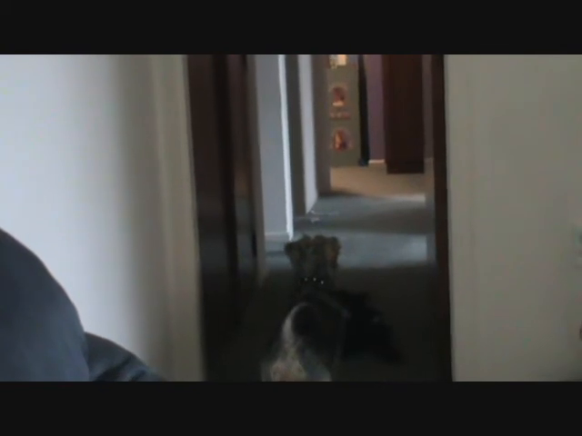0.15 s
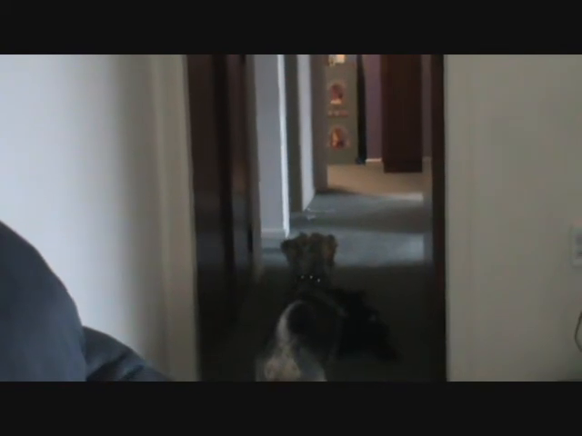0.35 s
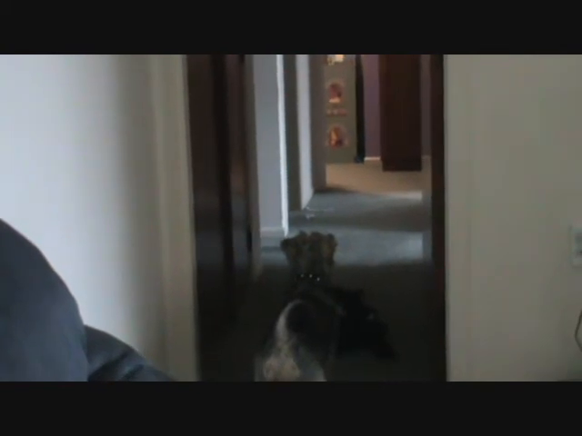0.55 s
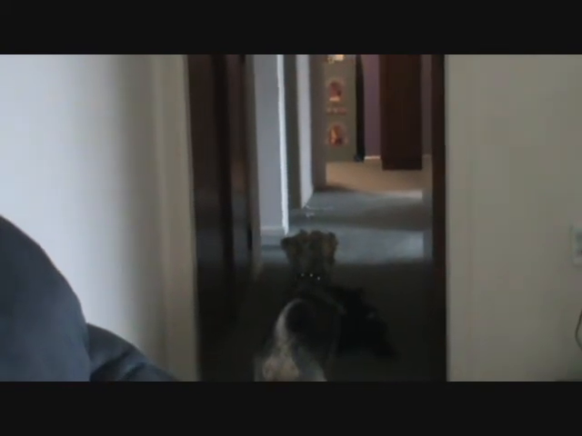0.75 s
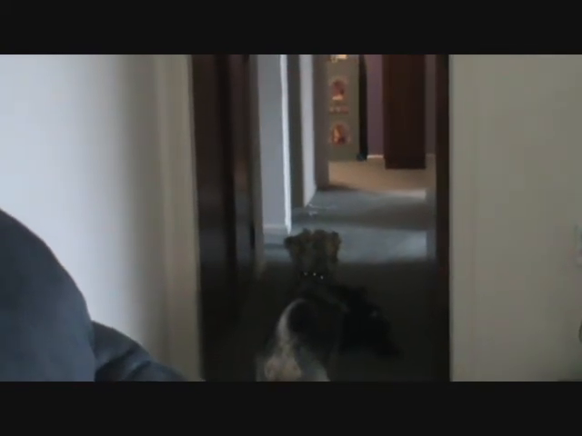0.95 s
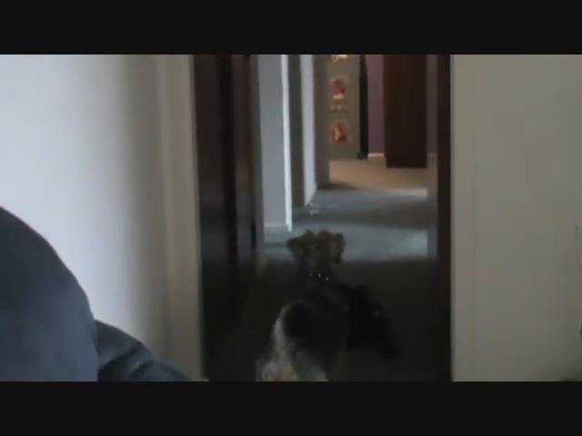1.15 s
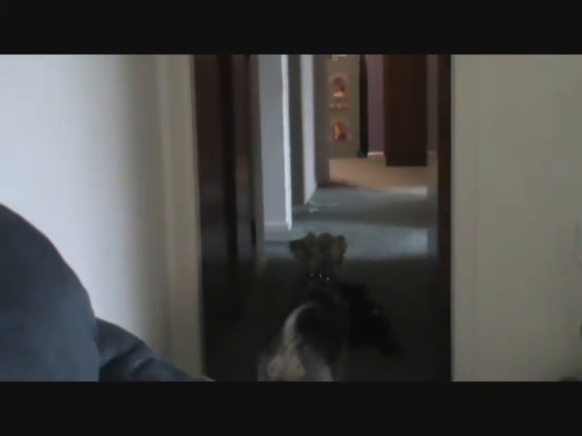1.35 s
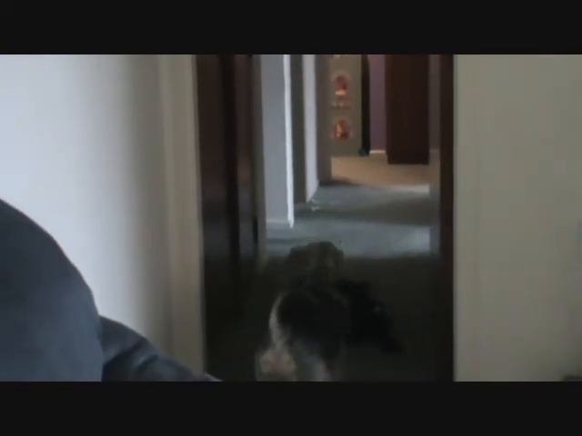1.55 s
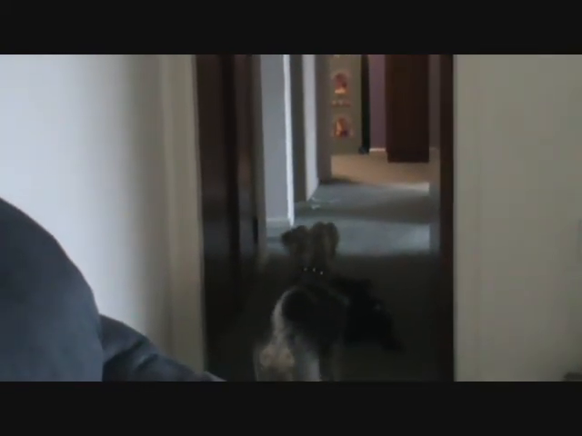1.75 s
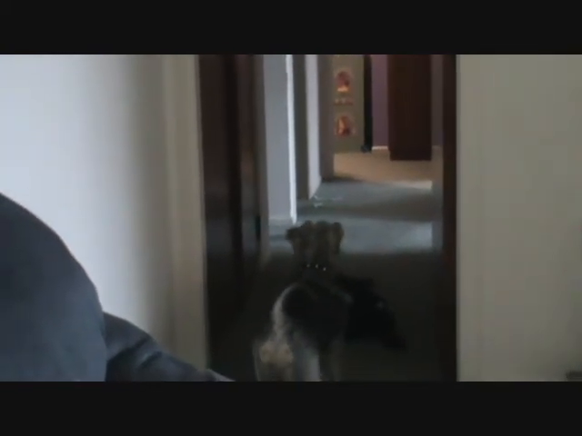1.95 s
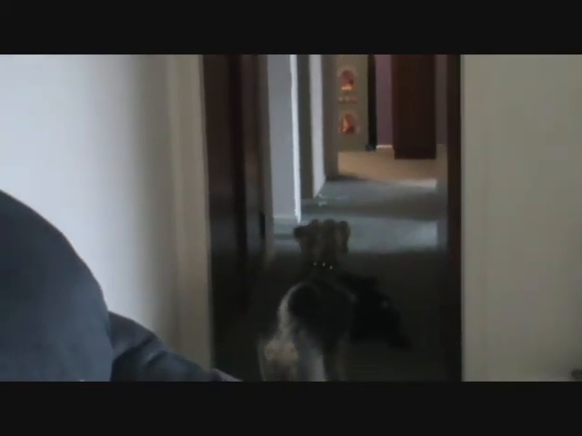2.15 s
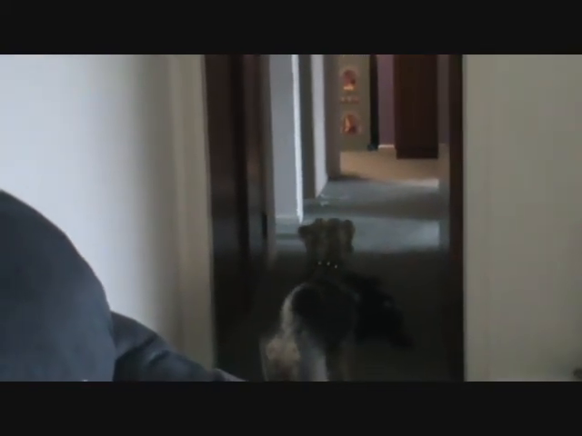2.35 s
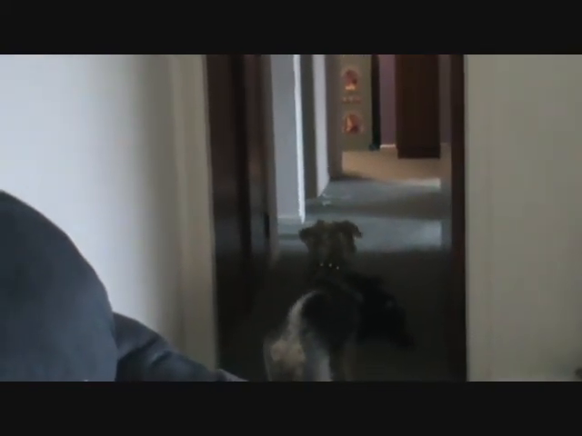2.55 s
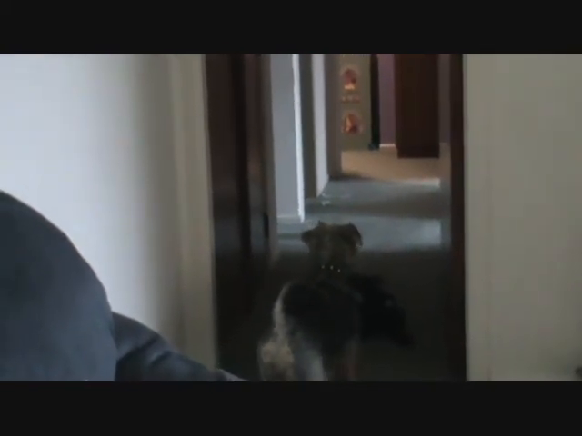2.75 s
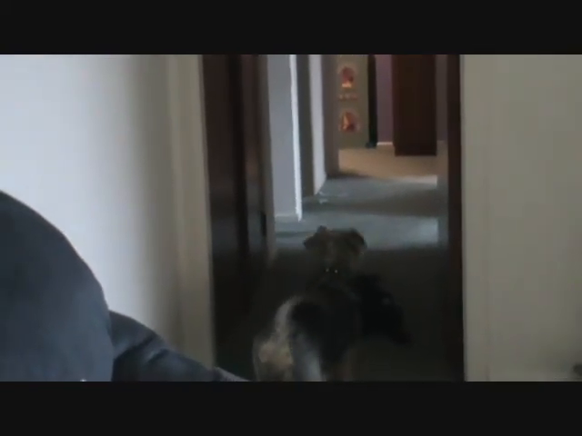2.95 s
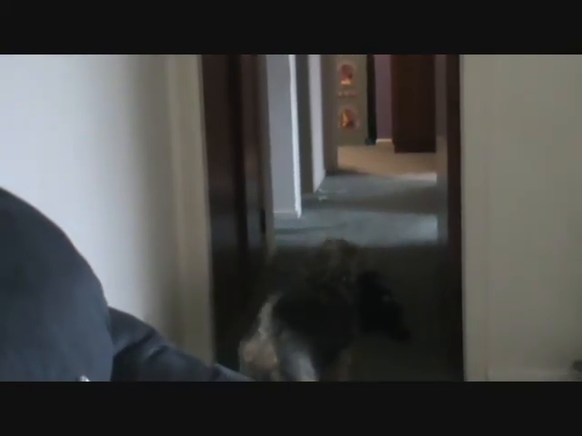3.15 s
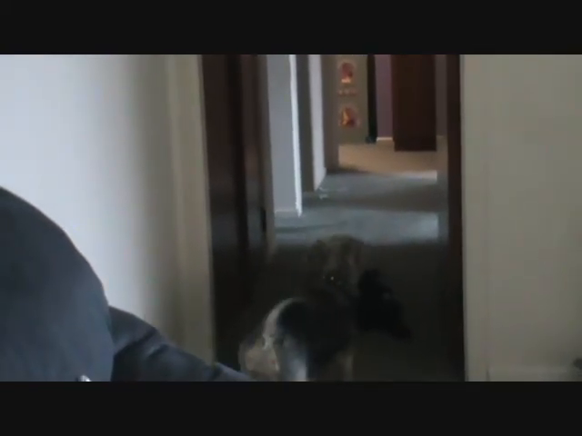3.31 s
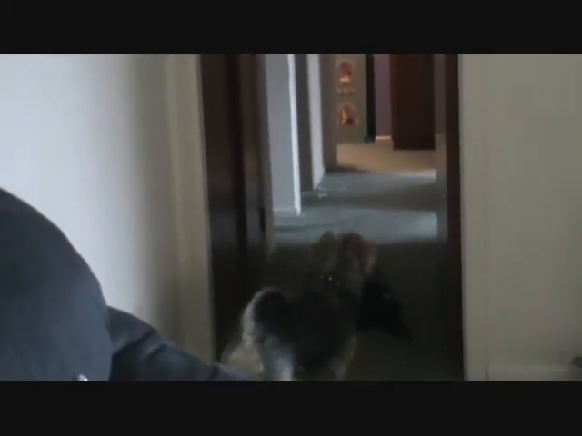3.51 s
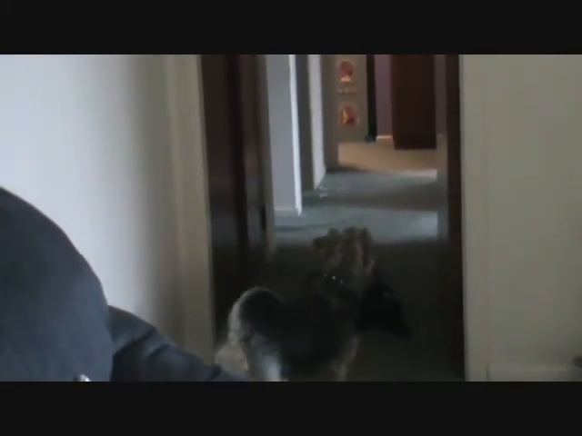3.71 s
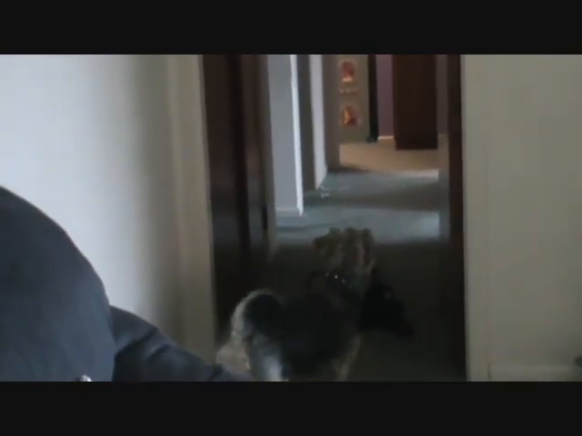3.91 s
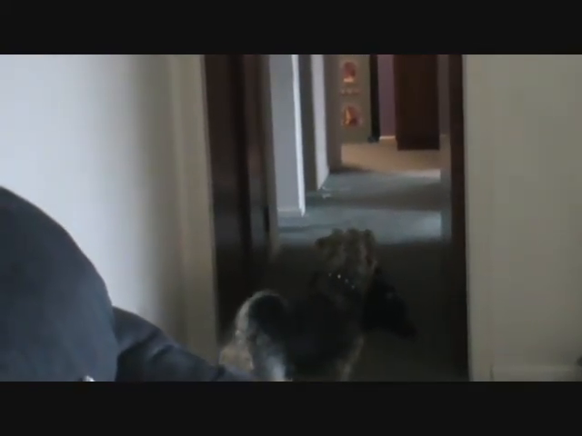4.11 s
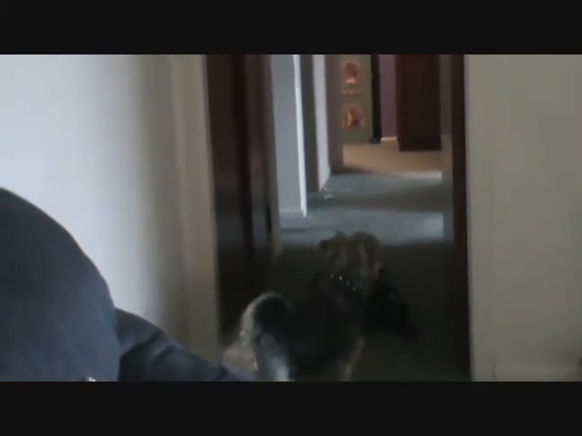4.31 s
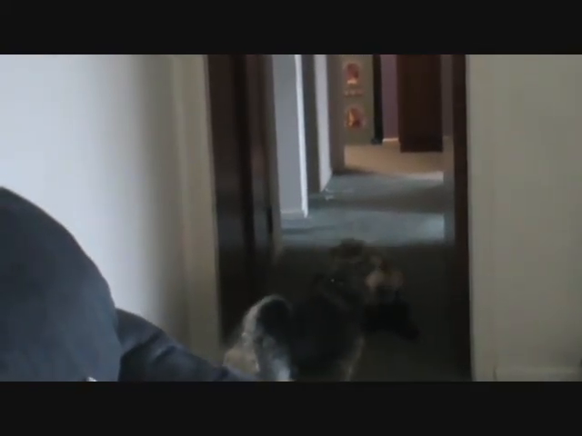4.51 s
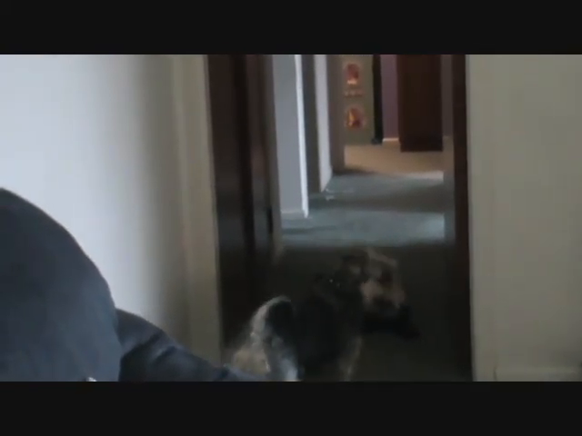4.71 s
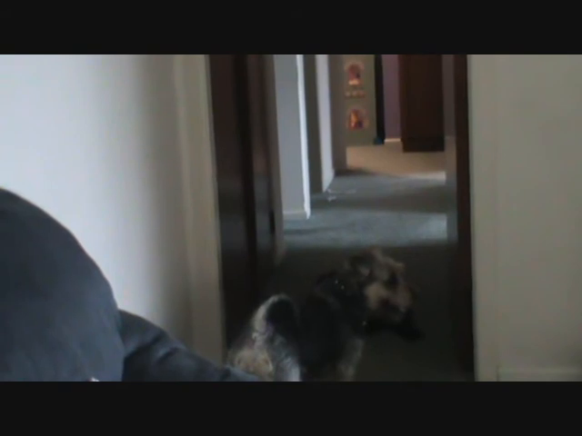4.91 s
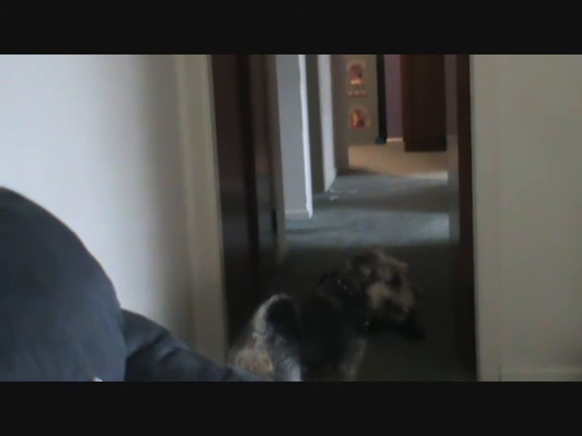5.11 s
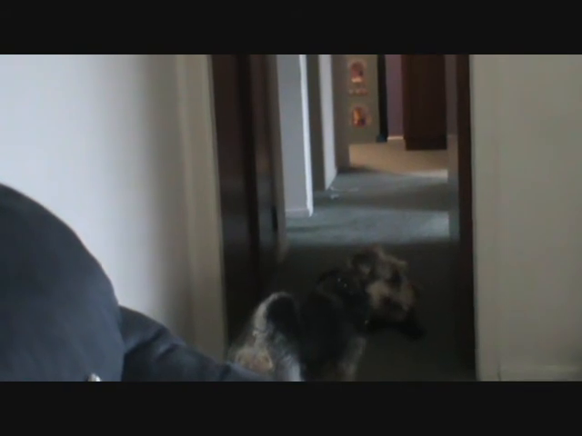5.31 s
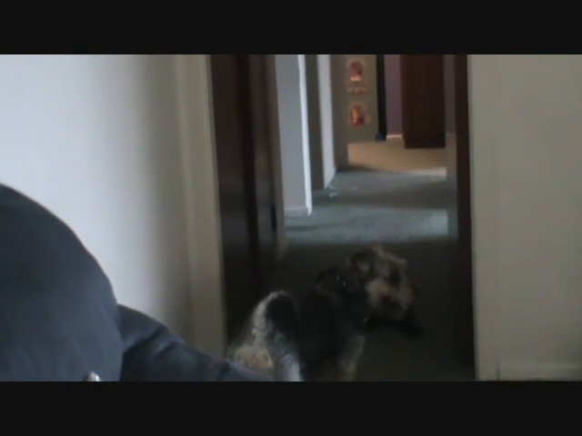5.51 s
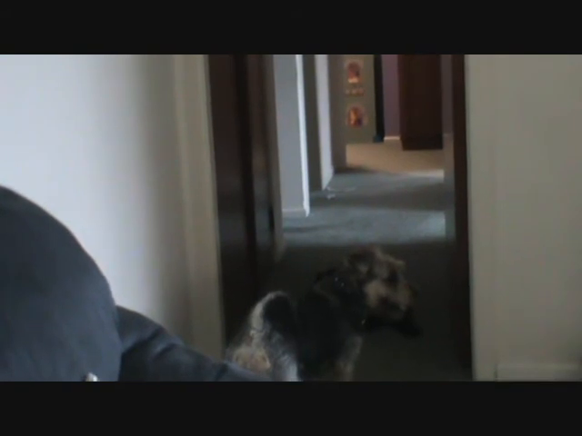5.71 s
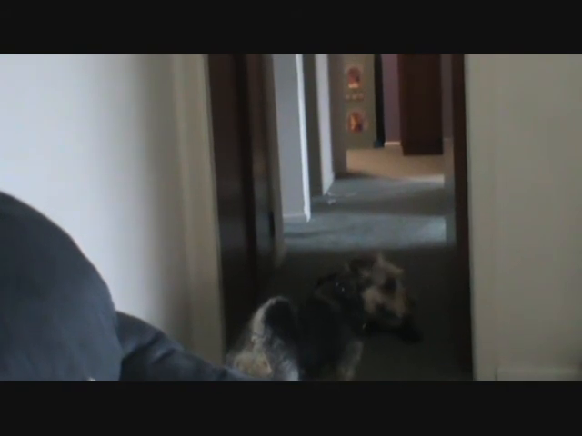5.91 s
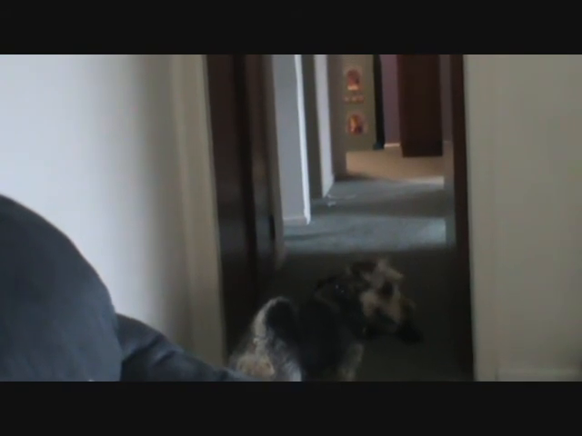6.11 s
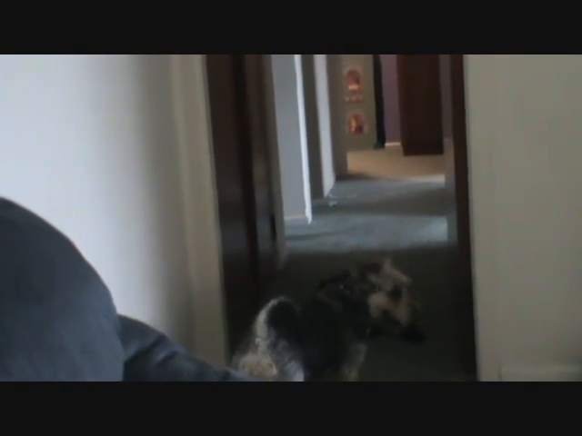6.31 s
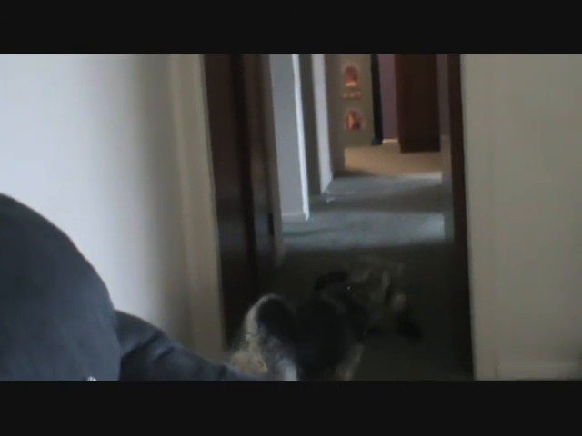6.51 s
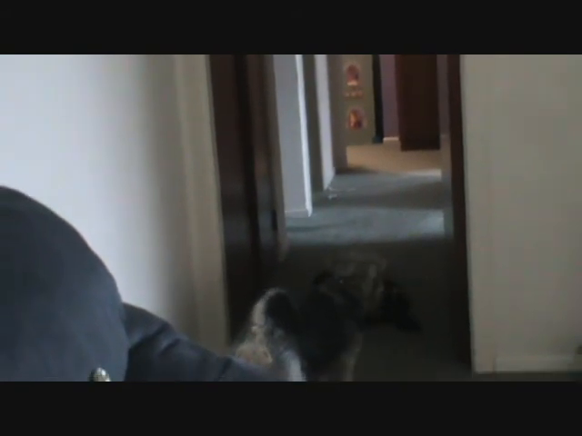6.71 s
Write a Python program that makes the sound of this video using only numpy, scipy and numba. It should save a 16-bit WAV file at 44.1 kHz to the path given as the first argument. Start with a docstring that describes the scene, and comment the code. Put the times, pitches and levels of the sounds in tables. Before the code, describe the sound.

Sharp high yaps from a little dog, one then a close pair, ring down a bare corridor; a muffled idling engine rises at the end.

```python
"""An engine idles outside over low rumble and faint lens-motor ticks; a puppy barks once, then twice more.
Barks: pulse trains and breath through throat, jaw and mouth resonances, echoed by a bare corridor.
Engine: wobbling orders of the firing rate plus exhaust noise; it sags, then revs up near the end.
Camera: the housing rings at motor steps and lens clicks; cloth rustles; the lens drive whines and whirrs.
Hand-held stereo pickup, a few metres off; gain control ducks under each bark."""
import sys
import numpy as np
from scipy import signal
from scipy.fft import rfft, irfft
from scipy.io import wavfile
from scipy.ndimage import uniform_filter1d
from numba import njit

SR = 44100
rng = np.random.default_rng(int(sys.argv[2]) if len(sys.argv) > 2 else 0)


def level_to_linear(level):
    """Convert decibel levels to linear amplitude factors, elementwise."""
    exponent = np.asarray(level, float) / 20
    return 10 ** exponent


def to_wav(s):
    """Save 16-bit WAV."""
    ch = np.atleast_2d(s).T  # columns
    pcm = np.round(np.clip(ch, -1, 1) * 32767)  # PCM
    wavfile.write(sys.argv[1], SR, pcm.astype(np.int16))


N = 298116  # samples

# posture of each bark, one table a bark: t/s, pitch f/Hz, effort/dB, mouth opening/0-1
BARK_POSTURES = [
    [(1.44, 154.9, -66, 0), (1.465, 199.7, -35.5, .05), (1.495, 251.1, -28, 0.13), (1.51, 267.1, -14, 0.65),
     (1.535, 281.3, -13.5, .65), (1.55, 670.2, 6.5, 0.73), (1.595, 606.8, 6.5, 0.92),
     (1.68, 568.3, -3.5, 1), (1.7, 330.4, -11.5, 0.48), (1.76, 120.5, -36.5, 0.16)],
    [(3.035, 152.2, -32, 0), (3.058, 227.1, -44, 0), (3.072, 273, -6, 0.66), (3.09, 282.9, -10.5, 0.4),
     (3.1, 683.2, 6, 0.84), (3.14, 663.8, 9, 0.79), (3.2, 545, 6, 0.91), (3.225, 520.6, 3.5, 0.9),
     (3.26, 323, -16.5, 0.28), (3.34, 169.4, -20, 0.33)],
    [(3.34, 199, -20, .05), (3.36, 270.1, -16, 0.04), (3.385, 289.7, -8.5, 0.33),
     (3.395, 592.7, 11.5, 0.36), (3.43, 547, 6.5, 0.88), (3.485, 520.4, 4, .77), (3.55, 507.2, -5.5, 0.76),
     (3.59, 300, -14.5, 0.15), (3.63, 195.2, -22, 0.24), (3.66, 149, -63, 0)],
]
# fixed throat and nose resonances: f/Hz, width per filter pass/Hz, relative level/dB
THROAT_MODES = [(800, 300, -6), (1100, 350, -8), (2600, 500, -17), (3020, 350, -15), (4000, 1100, -28),
                (6600, 3000, -42)]
# huffs and sniffs: centre t/s, half-length/s, rms level before window and flutter/dB, f/Hz, width per pass/Hz
HUFF_EVENTS = [(1.195, 0.091, -49, 820, 252), (1.203, 0.1, -54, 2130, 1550), (2.626, 0.11, -48, 1670, 800),
               (4.635, 0.15, -56.5, 1710, 960), (4.663, 0.23, -59.5, 3030, 910)]
# corridor echo by frequency: f/Hz, t60/s, relative level/dB
CORRIDOR_ECHO = [(100, 0.44, -4.5), (300, 0.57, -8), (494, 0.3, 5), (1600, 0.48, 2), (3980, 0.57, -10),
                 (10700, 0.37, 1.5)]
# left-right likeness of the puppy by frequency; the top treble is mono: f/Hz, likeness/0-1
CORRIDOR_LIKENESS = [(100, 0.19), (300, 0.99), (700, 1), (1400, 0.24), (2400, 0.97), (4400, 0.06),
                     (8000, 0.35), (12000, 1)]
# left-right likeness of the air, top treble joined nearly to mono: f/Hz, likeness/0-1
ROOM_AIR_LIKENESS = [(60, 1), (200, 0.99), (400, 0.83), (700, 0.77), (1300, 0.29), (2400, 0.29),
                     (8000, 0.15), (12000, 0.85)]
# stereo lean at facing 1: f/Hz, left minus right level/dB
FRONT_LEAN = [(60, -6.5), (200, 3), (400, 2.5), (700, 4), (1300, -1.9), (2400, -2), (4400, -7),
              (15000, 3.5)]
# stereo lead at facing 1: f/Hz, left phase lead/rad
FRONT_LEAD = [(60, 0.52), (200, 0.94), (400, 1), (700, 0.64), (3000, 0.64), (12000, 0.085)]
# engine course: t/s, firing rate f/Hz, relative level/dB, bearing toward left/0-1
ENGINE_COURSE = [(0, 31.3, -16.5, .1), (.8, 31.7, -10, 0.3), (1.45, 30.6, -14, .1),
                 (2.1, 30.49, -9.5, 0.15), (4, 30.23, -7.5, 0.12), (4.6, 29.31, -9, .1),
                 (5.05, 28.76, -14, 0), (5.28, 27.23, -13.5, 0.13), (5.52, 30.9, -0.5, .35),
                 (5.66, 34.5, 6.5, 0.85), (5.8, 39.08, 3, 0.7), (5.93, 41.54, 6, 1), (6.15, 42.9, 3, 1),
                 (6.3, 44.68, 3.5, 0.85), (6.44, 48.3, 4, 0.7), (6.56, 52.1, 2, 0.45), (6.7, 55.7, 2, 0.89),
                 (6.76, 53.8, 1, .25)]
# how the house passes orders 1-4: f/Hz, level at engine level 0 dB/dB
HOUSE_WALLS = [(28, -66), (44, -55), (52, -35), (62, -33.5), (70, -35.5), (85, -28), (92, -41),
               (105, -47.5), (118, -57), (133, -43), (160, -40.5), (200, -50.5)]
# exhaust colour of orders 5-15: f/Hz, relative level/dB
EXHAUST_COLOUR = [(150, 6), (200, -9), (250, -8), (300, -6.5), (450, -14), (600, -18)]
# housing modes: f/Hz, relative level/dB, t60/s
HOUSING_MODES = [(2100, -7, .03), (3500, -6, .025), (4800, 0, .03), (5400, -6, .02), (6200, 0, .02),
                 (8000, -12, .01)]
# single louder clicks of the lens mechanism: t/s, level/dB, crack f/Hz, housing-ring share/0-1
LENS_CLICKS = [(4.9964, -37, 4040, 0.4), (5.026, -22, 6800, 0.071), (5.0448, -33, 6440, 0.36),
               (6.127, -32, 5420, 0.4), (6.4302, -52, 4040, 0.17), (6.4324, -34, 3030, 0.3),
               (6.5275, -28.5, 3500, 0.45), (6.566, -30.5, 6080, 0.63), (6.5874, -36, 4630, 0.5)]
# cloth brushing the camera: centre t/s, length/s, rms level/dB
CLOTH_RUSTLES = [(5.291, 0.05, -44), (6.426, 0.015, -43)]
# air spectrum: f/Hz, relative density/dB
AIR_SPECTRUM = [(15, -63), (25, -16.5), (43, -4.5), (64, 1.5), (114, -11.5), (153, -9.5), (293, -14.5),
                (384, -23.5), (427, -18), (560, -18), (1130, -19.5), (2410, -28.5), (4490, -34.5),
                (6560, -40), (16000, -48.5)]


def set_rms(x, db):
    """Scales x to an rms level in dB."""
    return x * level_to_linear(db) / np.sqrt(np.mean(x ** 2))


def curves(rows, t):
    """Table columns, linear in time."""
    s, *columns = np.transpose(rows)
    return [np.interp(t, s, column) for column in columns]


def across(points, hz):
    """Spectrum, linear on a log-frequency axis."""
    f, value = np.transpose(points)
    return np.interp(np.log(np.maximum(hz, 1)), np.log(f), value)


def walk(rate_hz, size):
    """Random levels held 1 / rate_hz and slewed twice; spread near 1."""
    hold = int(SR / rate_hz)
    held = np.repeat(rng.standard_normal(size // hold + 1), hold)
    return 1.326 * uniform_filter1d(uniform_filter1d(held, hold), hold)[:size]


@njit
def svf(x, hz, width_hz):
    """State-variable band-pass with a moving centre, gain 1 at the centre."""
    y, band_state, low_state = np.empty(len(x)), 0., 0.
    for i in range(len(x)):
        g, damping = np.tan(np.pi * hz[i] / SR), width_hz / hz[i]
        v = (band_state + g * (x[i] - low_state)) / (1 + g * (g + damping))
        band_state = 2 * v - band_state
        low_state += 2 * g * v
        y[i] = damping * v
    return y


def band(x, hz, width_hz):
    """One band-pass, centre fixed or moving."""
    return svf(x, hz + np.zeros(len(x)), 1. * width_hz)


def twice(x, hz, width_hz):
    """Two equal band-passes in series: a steep resonance."""
    return band(band(x, hz, width_hz), hz, width_hz)


def add(out, start_s, x):
    """Mixes x into out from start_s."""
    i = int(start_s * SR)
    out[i:i + len(x)] += x[:len(out) - i]


MOUTH_SHUT_HZ, MOUTH_OPEN_HZ = 760, 1793


def bark(rows):
    """Glottal pulses, jittered and breathy when rough, excite throat, moving jaw and moving mouth."""
    mouth_width_hz, jaw_width_hz = 272, 160  # per filter pass
    shut_muffle_db, chest_db, steepen_db = -9, -3.5, -22
    t = np.arange(rows[0][0], rows[-1][0], 1 / SR)
    size = len(t)
    hz, effort_db, rough, jaw_hz, jaw_db, mouth_hz = posture(rows, t)
    jitter = 1 + 0.121 * rough * walk(253.1, size)
    phase = 2 * np.pi * np.cumsum(hz * jitter) / SR
    k = np.arange(1, 41)[:, None]
    rolloff = 1 + (k * hz / 6000) ** 4
    pulses = np.sum(np.cos(k * phase) / rolloff, axis=0) * np.sqrt(hz / 600)
    shimmer = level_to_linear(6.2 * rough * walk(200, size))
    # uneven folds alternate the cycles: half-pitch lines
    doubling = 1 + 0.73 * rough * np.cos(phase / 2)
    breath = 7.45 * rough * rng.standard_normal(size) * (1 + np.cos(phase))
    source = pulses * shimmer * doubling + breath

    mouth = twice(source, mouth_hz, mouth_width_hz)
    jaw = level_to_linear(jaw_db) * twice(source, jaw_hz, jaw_width_hz)
    throat = sum(level_to_linear(db) * twice(source, f, width_hz) for f, width_hz, db in THROAT_MODES)
    # a shut mouth muffles the throat
    muffle_db = np.interp(mouth_hz, [MOUTH_SHUT_HZ, MOUTH_OPEN_HZ], [shut_muffle_db, 0])
    voice = mouth + jaw + level_to_linear(muffle_db) * throat

    # the low register thumps from the chest
    low = np.clip((450 - hz) / 150, 0, 1)
    rumble = 14 * rough * twice(rng.standard_normal(size), 228, 225)
    chest = level_to_linear(chest_db) * low * (0.1 * np.cos(phase) * shimmer + rumble)
    # the mouth wave steepens with effort and sheds multiples of its resonance
    bent = np.tanh(6.5 * twice(pulses, mouth_hz, mouth_width_hz) + 0.89)
    steep = level_to_linear(steepen_db + effort_db) * twice(bent, 7240, 5500)
    onset = np.minimum((t - t[0]) / 0.01, 1)
    return (voice + chest + steep) * level_to_linear(effort_db) * onset


def posture(rows, t):
    """Pitch and effort; roughness follows the register, jaw and mouth resonances the opening."""
    register_hz, settle_s = 450, .05
    rough_low, rough_flip, rough_settled = .33, .38, .09
    jaw_shut_hz, jaw_open_hz, jaw_base_db, jaw_fade_db = 365, 567, -3, -10.5
    hz, effort_db, opening = curves(rows, t)
    opening = np.clip(opening, 0, 1.1)
    high = hz > register_hz
    # roughest as the voice flips up, then settling
    settling = np.exp(-np.cumsum(high) / SR / settle_s)
    rough_high = rough_settled + (rough_flip - rough_settled) * settling
    rough = uniform_filter1d(np.where(high, rough_high, rough_low), size=400)
    jaw_hz = jaw_shut_hz + (jaw_open_hz - jaw_shut_hz) * np.minimum(2 * opening, 1)
    # the jaw resonance weakens while the high note is held
    jaw_db = jaw_base_db + jaw_fade_db * uniform_filter1d(high * (1 - settling), size=800)
    mouth_hz = MOUTH_SHUT_HZ + (MOUTH_OPEN_HZ - MOUTH_SHUT_HZ) * opening
    return hz, effort_db, rough, jaw_hz, jaw_db, mouth_hz


def huff(half_s, db, hz, width_hz):
    """Breath noise through one resonance, swelling and fading with a flutter."""
    size = int(2 * half_s * SR)
    breath = set_rms(twice(rng.standard_normal(size), hz, width_hz), db)
    return breath * np.hanning(size) * level_to_linear(2.2 * walk(61, size))


def puppy():
    """Barks and huffs summed at the mouth."""
    out = np.zeros(N)
    for rows in BARK_POSTURES:
        add(out, rows[0][0], bark(rows))
    for centre_s, half_s, db, hz, width_hz in HUFF_EVENTS:
        add(out, centre_s - half_s, huff(half_s, db, hz, width_hz))
    return out


def corridor(x, direct_db=2.0):
    """Two unrelated noise-band echo tails, each band with its own decay; direct sound heads the first."""
    size = int(.9 * SR)
    t = np.arange(size) / SR
    f, t60_s, tail_db = np.transpose(CORRIDOR_ECHO)
    tails = np.zeros((2, size))
    for hz in 60 * 2 ** np.arange(0, 8.1, .5):
        decay_s = np.interp(np.log(hz), np.log(f), t60_s)
        gain = level_to_linear(np.interp(np.log(hz), np.log(f), tail_db))
        fade = gain * np.exp(-np.log(1000) * t / decay_s) * np.minimum(t / 0.011, 1)
        for tail in tails:
            tail += band(rng.standard_normal(size), hz, hz / 7.14) * fade
    tails /= np.sqrt(np.sum(tails ** 2, axis=1, keepdims=True))
    tails[0, 0] += level_to_linear(direct_db)
    return signal.fftconvolve(x[None], tails, axes=1)[:, :N]


def stereo(a, b, likeness, facing):
    """Left gets a, right a mix of a and unrelated b; facing scales a level lean and phase lead to left."""
    hz = np.fft.rfftfreq(N, 1 / SR)
    like = np.clip(across(likeness, hz), 0, 1)
    lean = level_to_linear(facing * across(FRONT_LEAN, hz) / 2)
    turn = lean * np.exp(.5j * facing * across(FRONT_LEAD, hz))
    a, b = rfft(a), rfft(b)
    right = like * a + np.sqrt(1 - like ** 2) * b
    return irfft(np.array([a * turn, right / turn]), N)


def engine():
    """Orders of the firing rate; uneven firing wobbles them, most at idle; load brightens the exhaust."""
    idle_hz, full_hz, idle_load, full_load = 29.96, 51.4, 0.24, 1
    gas_idle_db, gas_full_db, gas_full_hz = -70, -49, 34.1
    upper_db = -46  # orders above the fourth
    left_lean_db, left_lead_rad = 3.5, 1  # at bearing 1
    t = np.arange(N) / SR
    hz, engine_db, bearing = curves(ENGINE_COURSE, t)
    load = np.clip(np.interp(hz, [idle_hz, full_hz], [idle_load, full_load]), 0, 1)
    gas_db = np.interp(hz, [idle_hz + 1, gas_full_hz], [gas_idle_db, gas_full_db])
    lean_db, lead_rad = left_lean_db * bearing, left_lead_rad * bearing
    uneven = 1 + 0.01243 * (1 - load) * walk(14, N)
    phase = 2 * np.pi * np.cumsum(hz * uneven) / SR
    side = np.array([[.5], [-.5]])
    orders = 0
    for k in range(1, 16):
        if k < 5:
            colour_db = across(HOUSE_WALLS, k * hz)
        else:
            colour_db = upper_db + across(EXHAUST_COLOUR, k * hz) - 8 * (1 - load)
        wobble_db = (3.94 * (1 - load) + 0.36 * max(k - 2, 0)) * walk(9.1, N)
        drift = 0.78 * walk(6, N) + 0.14 * max(k - 3, 0) * walk(20, N) + rng.uniform(0, 2 * np.pi)
        tone = np.sin(k * phase + drift + side * lead_rad)
        orders = orders + np.sqrt(2) * level_to_linear(engine_db + colour_db + wobble_db) * tone
    # exhaust gas puffs at the firing rate
    puffs = rng.standard_normal(N) * (1 + np.cos(phase)) ** 2
    gas = set_rms(twice(puffs, 656, 120), 0) * level_to_linear(gas_db)
    return (orders + gas) * level_to_linear(side * lean_db)


def camera():
    """Sum of clicks, cloth and lens-motor sounds."""
    ring_t = np.arange(int(.04 * SR)) / SR
    ring = housing_ring(ring_t)
    out = motor_steps(ring)
    add_lens_clicks(out, ring, ring_t)
    add_rustles(out)
    return out + lens_drive()


def housing_ring(t):
    """Decaying sine modes of the camera housing, peak 1."""
    ring = sum(level_to_linear(db) * np.sin(2 * np.pi * hz * t) * np.exp(-np.log(1000) * t / t60_s)
               for hz, db, t60_s in HOUSING_MODES)
    return ring / np.abs(ring).max()


def motor_steps(ring):
    """Motor steps at 50 Hz, unequal in level, each ringing the housing."""
    grow_s, ease_s = 3, 6.12  # louder from grow_s, quiet again after ease_s
    quiet_db, loud_db, scatter_db = -54, -45, 3.5
    at = np.arange(.0068, N / SR, 1 / 50)
    step_db = np.interp(at, [grow_s, ease_s], [quiet_db, loud_db], right=quiet_db)
    steps = np.zeros(N)
    steps[(at * SR).astype(int)] = level_to_linear(step_db + scatter_db * rng.standard_normal(len(at)))
    return signal.fftconvolve(steps, ring)[:N]


def add_lens_clicks(out, ring, ring_t):
    """Single louder clicks of the lens mechanism: a short noise crack plus the housing ring."""
    for start_s, db, hz, share in LENS_CLICKS:
        burst = rng.standard_normal(len(ring_t)) * np.exp(-ring_t / 0.00081)
        crack = twice(burst, hz, 0.48 * hz)
        add(out, start_s, level_to_linear(db) * ((1 - share) * crack / np.abs(crack).max() + share * ring))


def add_rustles(out):
    """Cloth friction: uneven noise grains in a wide and a low band."""
    for centre_s, length_s, db in CLOTH_RUSTLES:
        size = int(length_s * SR)
        grains = rng.standard_normal(size) * level_to_linear(2.5 * walk(500, size)) * np.linspace(.4, 1, size)
        brush = band(grains, 2740, 6000) + 13.0 * band(grains, 699.5, 1350)
        add(out, centre_s - length_s / 2, set_rms(brush, db))


def lens_drive():
    """An unsteady whine tone and a whirr of noise that swells and sags in pitch."""
    start_s, whine_hz, base_whine_db = 6.55, 6670, -62
    full_whirr_db, swell_s, start_whirr_hz, sag_hz_per_s = -53, 0.13, 6030, 5300
    t = np.arange(N) / SR
    since = np.maximum(t - start_s, 0)
    whine_db = base_whine_db - 60 * np.clip(1 - since / .015, 0, 1)
    whirr_db = full_whirr_db - 30 * np.clip(1 - since / swell_s, 0, 1) - 60 * (since == 0)
    whirr_hz = start_whirr_hz - sag_hz_per_s * since
    tone = np.sqrt(2) * np.sin(2 * np.pi * whine_hz * t + 1.5 * walk(40, N))
    whine = tone * level_to_linear(whine_db + 3.5 * walk(40, N))
    whirr = set_rms(twice(rng.standard_normal(N), whirr_hz, 1500), 0) * level_to_linear(whirr_db)
    return whine + whirr


def air():
    """House rumble and capsule hiss as two unrelated shaped noises; the lows swell slowly."""
    above_330_hz_db = -46  # rms
    hz = np.fft.rfftfreq(N, 1 / SR)
    spectrum = rfft(rng.standard_normal((2, N))) * level_to_linear(across(AIR_SPECTRUM, hz))
    scale = level_to_linear(above_330_hz_db) / np.std(irfft(spectrum * (hz > 330), N))
    full = irfft(spectrum, N)
    lows = irfft(spectrum / (1 + (hz / 500) ** 2), N)
    swell = (level_to_linear(0.5 * walk(1.2, N)) - 1) * lows
    cut = (level_to_linear(-1.5) - 1) * irfft(spectrum * (hz < 200), N)  # 1.5 dB off below 200 Hz
    return scale * (full + swell + cut)


def scene():
    """Puppy in the corridor, air, engine and camera in stereo."""
    dog = stereo(*corridor(level_to_linear(1.0) * puppy()), CORRIDOR_LIKENESS, 0.88)
    room_air = stereo(*air(), ROOM_AIR_LIKENESS, 0.24)
    camera_lean = level_to_linear(np.array([[-1.5], [1.5]]))  # toward the right
    return dog + room_air + engine() + camera() * camera_lean


@njit
def gain_control(x, top, attack, release, sink, recover, share):
    """A fast limiter, and a slow stage that sinks while it works and creeps back; rates per sample."""
    gain, envelope, slow = np.empty(len(x)), 0., 0.
    for i in range(len(x)):
        envelope += (x[i] - envelope) * (attack if x[i] > envelope else release)
        duck = np.log(max(envelope * np.exp(-slow) / top, 1.))
        slow += share * duck * sink - slow * recover
        gain[i] = np.exp(-duck - slow)
    return gain


def band_limit(x):
    """A steep low-pass at the top of the band."""
    return signal.sosfilt(signal.butter(12, 16620, fs=SR, output="sos"), x)


def record(dry):
    """One gain, driven by the louder channel, on both; then hard clipping."""
    top_db, attack_s, release_s, sink_s, recover_s = -7.5, .0006, 0.0063, .4, 2.2
    louder = np.abs(dry).max(axis=0)
    gain = gain_control(louder, level_to_linear(top_db), 1 / (attack_s * SR), 1 / (release_s * SR),
                        1 / (sink_s * SR), 1 / (recover_s * SR), 0.98)
    mix = np.clip(dry * gain, -1, 1)
    return band_limit(mix)


dry = scene()
out = record(dry)
to_wav(out)
```